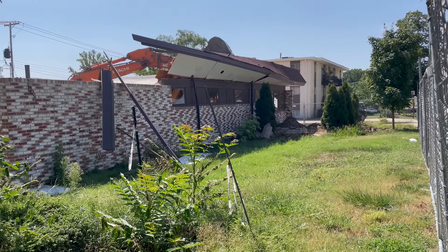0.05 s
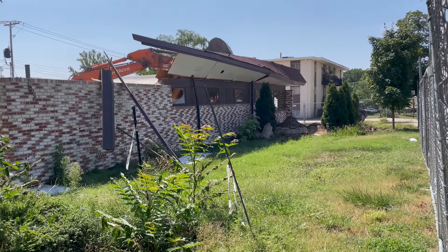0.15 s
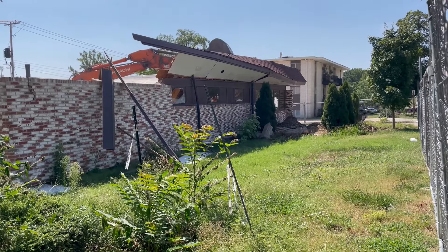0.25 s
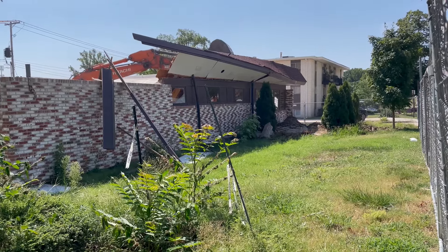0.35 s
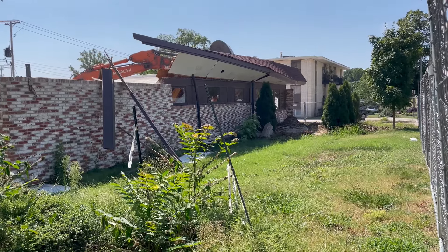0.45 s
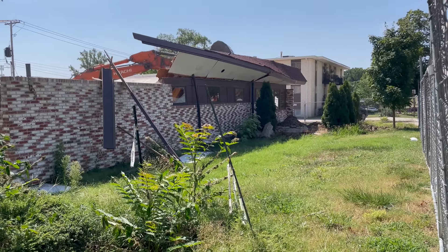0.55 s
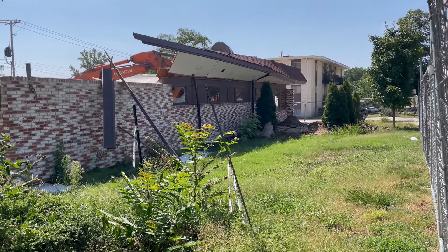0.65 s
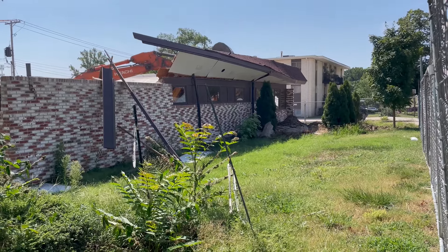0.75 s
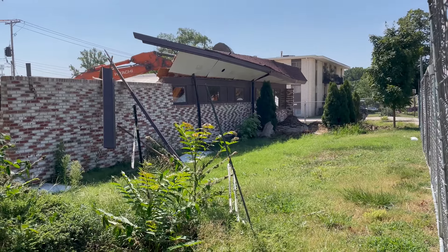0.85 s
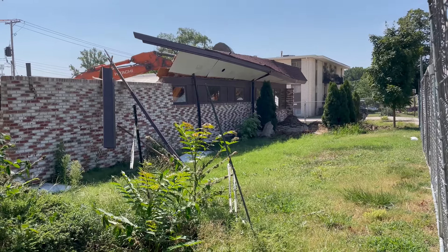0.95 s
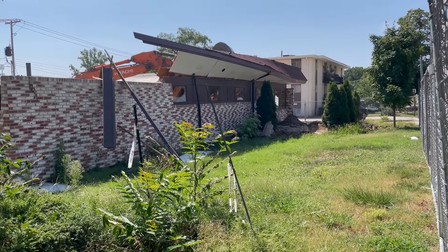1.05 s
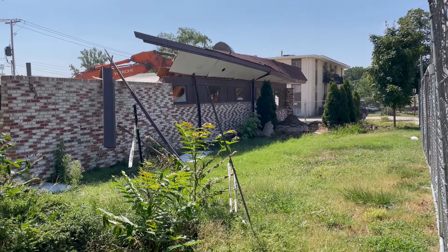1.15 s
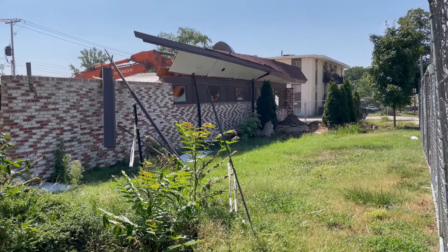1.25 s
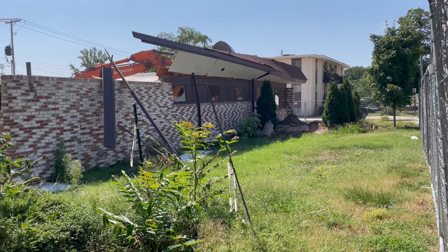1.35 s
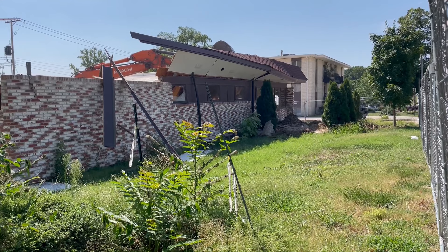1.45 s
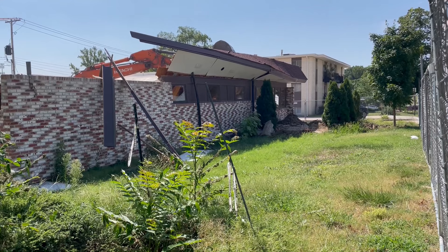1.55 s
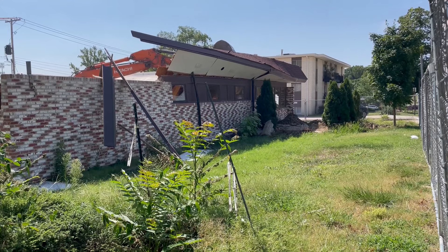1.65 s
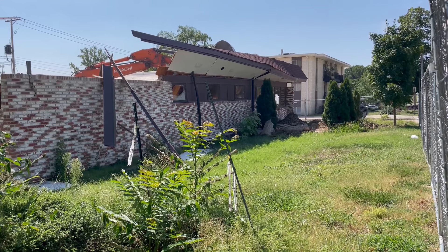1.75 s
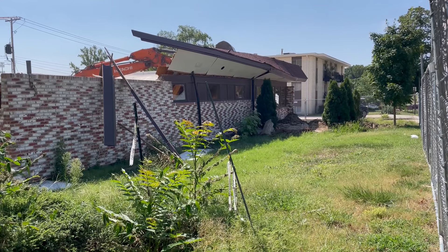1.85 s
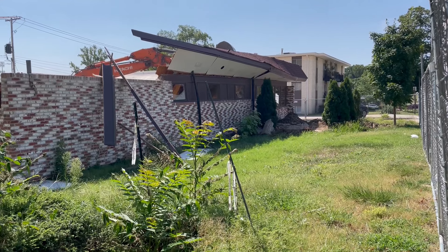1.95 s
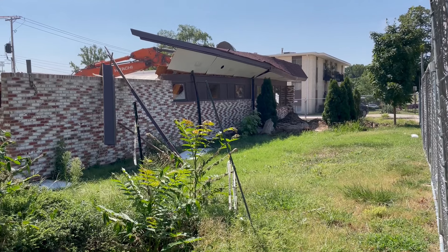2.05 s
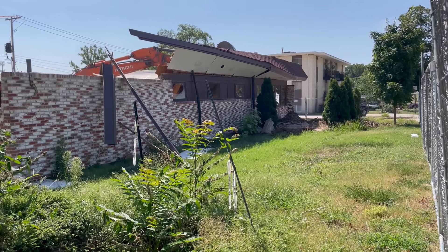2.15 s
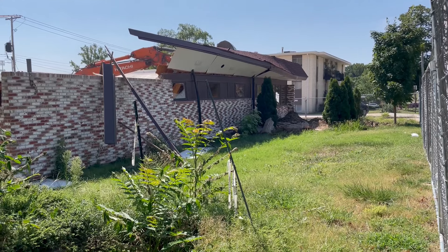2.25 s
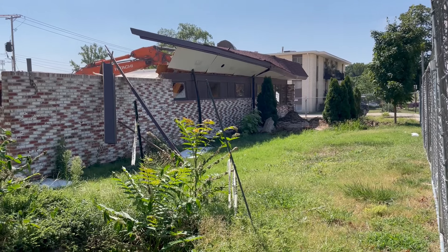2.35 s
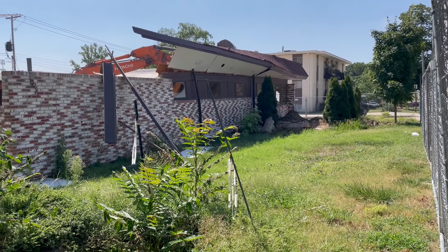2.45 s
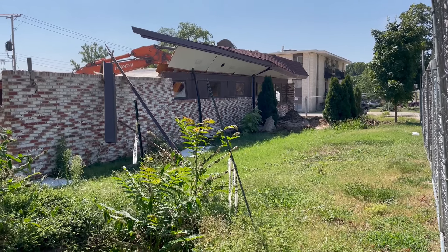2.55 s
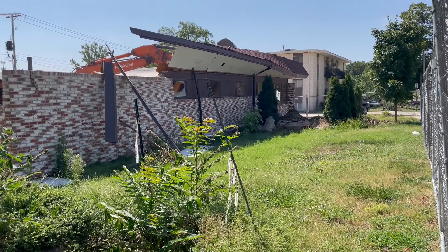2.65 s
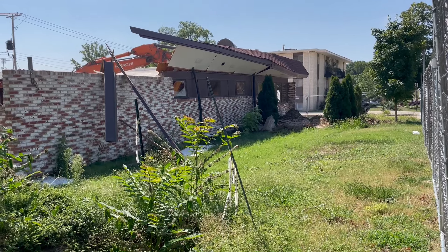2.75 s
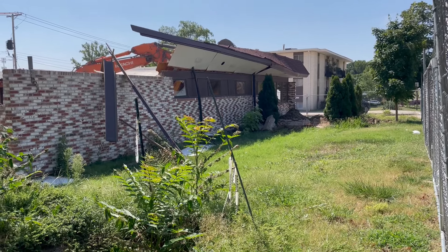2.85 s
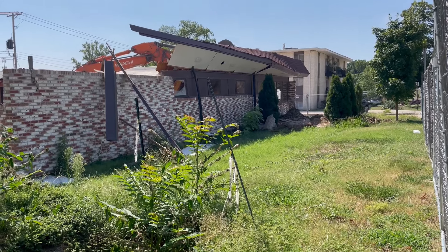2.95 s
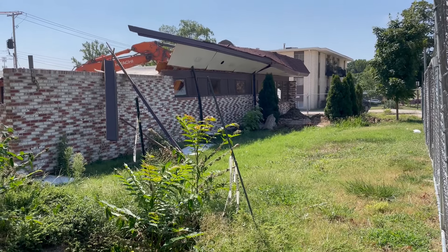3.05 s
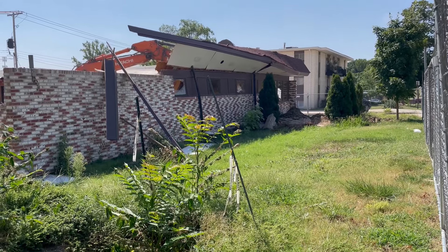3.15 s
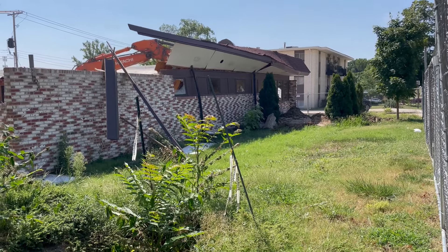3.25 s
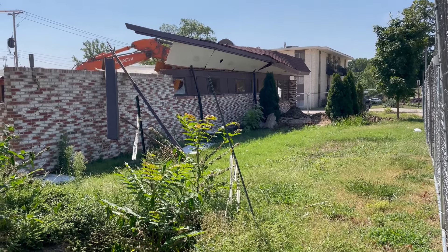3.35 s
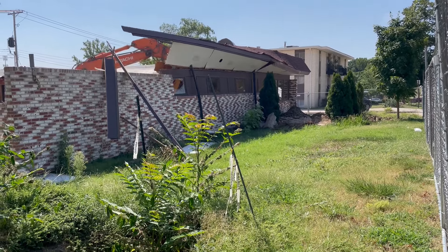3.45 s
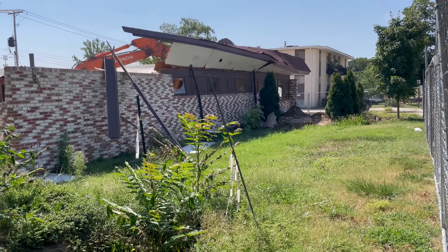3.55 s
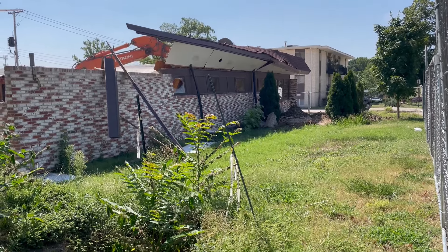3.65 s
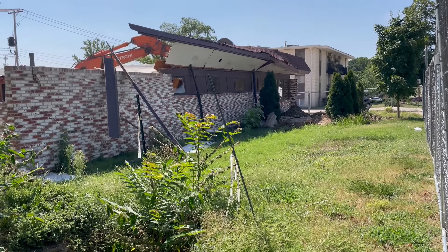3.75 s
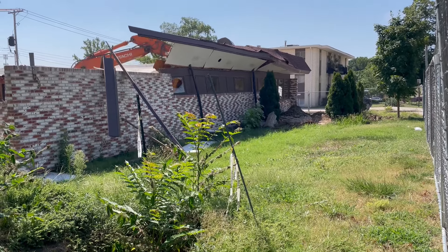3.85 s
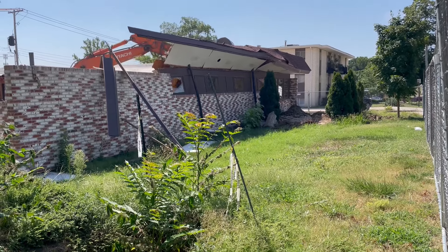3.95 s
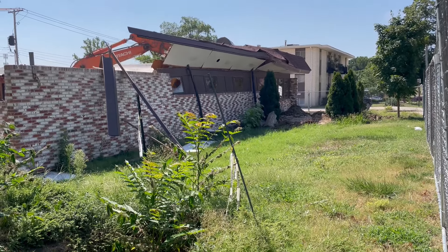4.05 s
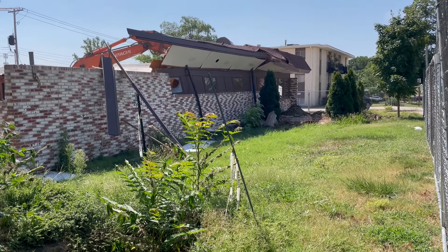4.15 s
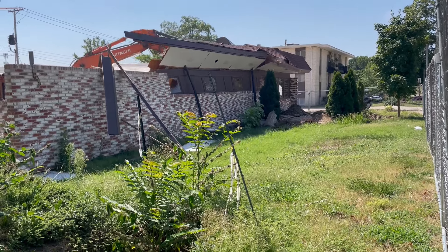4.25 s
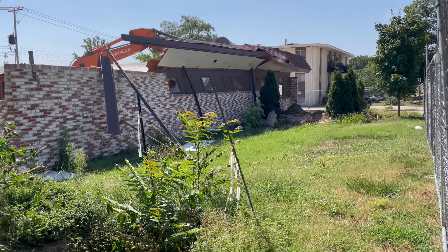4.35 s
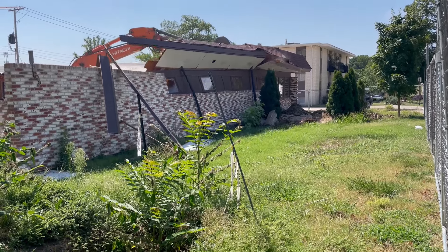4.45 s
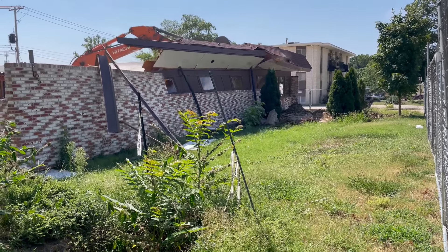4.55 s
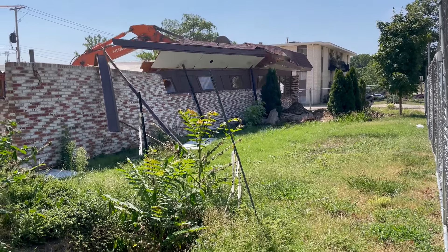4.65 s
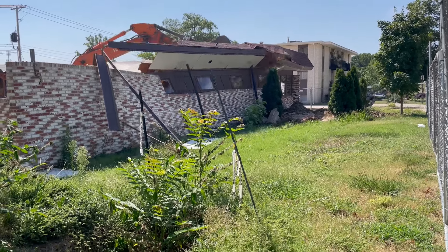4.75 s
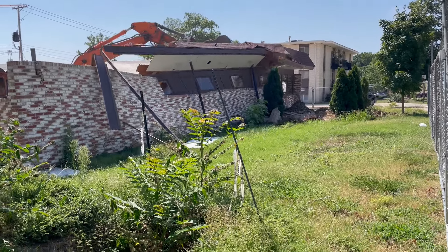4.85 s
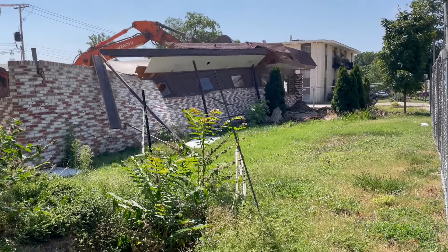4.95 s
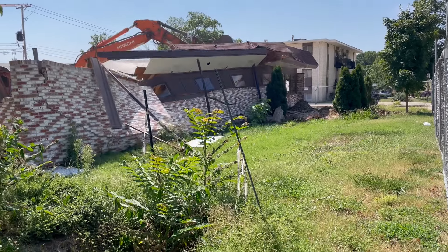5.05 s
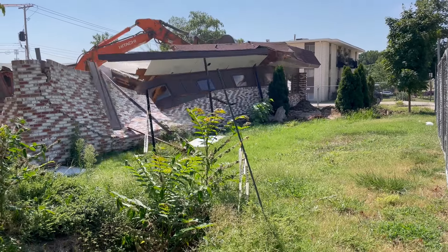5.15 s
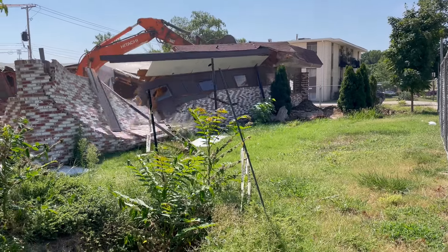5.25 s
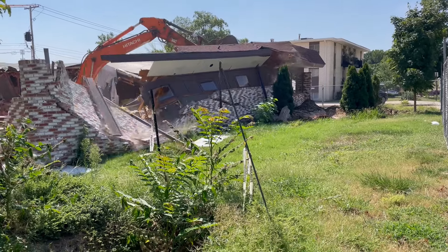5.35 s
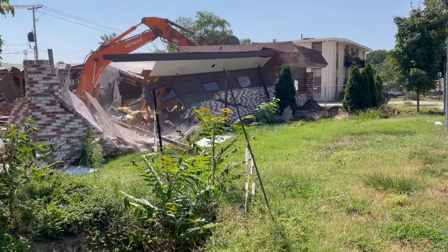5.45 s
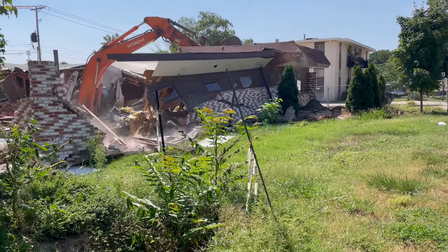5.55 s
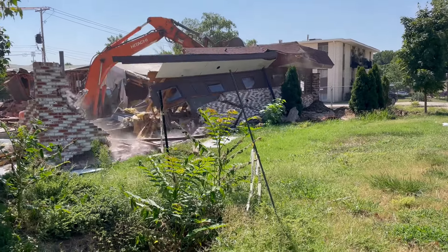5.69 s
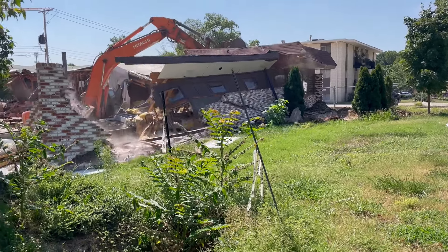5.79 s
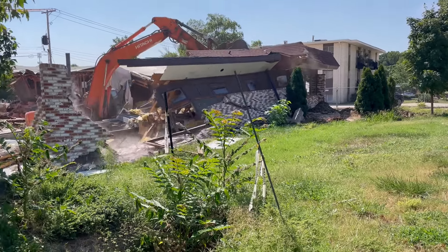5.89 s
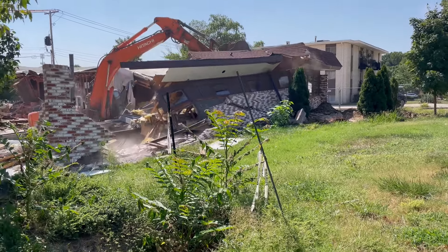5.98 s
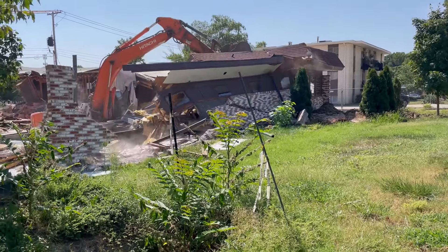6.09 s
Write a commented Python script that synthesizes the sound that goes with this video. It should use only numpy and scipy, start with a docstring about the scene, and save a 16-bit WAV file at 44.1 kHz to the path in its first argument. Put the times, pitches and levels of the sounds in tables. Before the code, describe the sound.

Outdoors, across a lawn from a demolition, the low hum of an excavator engine is heard first, with a barely audible insect in the weeds. Wood starts to splinter in separate cracks, followed by sharp snaps, knocks and deep thumps. The breaking becomes continuous, and ends at its loudest with a brick wall crashing down amid clattering boards, scraping roofing and rumbling rubble.

```python
"""A diesel drones behind a wall and an insect chirps in the weeds on a summer day.
Across the lawn an excavator pulls down a low brick building: timber and roofing crack and ring,
rubble slides, and heavy masses shake the ground, louder and louder until the wall falls.
Two close microphone ports pick up the direct and the scattered sound."""
import sys
import numpy as np
from scipy import signal
from scipy.fft import rfft, irfft, next_fast_len
from scipy.io import wavfile
from scipy.ndimage import uniform_filter1d

SR = 44100
rng = np.random.default_rng(int(sys.argv[2]) if len(sys.argv) > 2 else 0)


def materialize(psi):
    """Save the field psi as 16-bit PCM at rate SR to the path in sys.argv[1].

    A 1-D psi becomes a single channel; in a 2-D psi each row is a channel.
    """
    bounded = np.clip(np.atleast_2d(psi).T, -1, 1)
    quanta = np.round(bounded * 32767).astype(np.int16)
    wavfile.write(sys.argv[1], SR, quanta)


N = 269892
TIME_S = np.arange(N) / SR
FFT_SIZE = next_fast_len(N + SR)
BIN_HZ = np.maximum(np.arange(FFT_SIZE // 2 + 1) * SR / FFT_SIZE, 1)


def amp(db):
    """Decibels to gain."""
    return 10 ** (np.asarray(db) / 20)


def unit_rms(x):
    """Scales to rms 1."""
    return x / np.sqrt(np.mean(x ** 2) + 1e-20)


def per_bin(points):
    """Rows of (Hz, value) read at every FFT bin, on a log axis."""
    hz, value = np.transpose(points)
    return np.interp(np.log(BIN_HZ), np.log(np.maximum(hz, 1)), value)


def colour(x, spectrum):
    """Applies a spectrum of (Hz, dB) rows at minimum phase, so nothing sounds early."""
    cepstrum = irfft(per_bin(spectrum) * np.log(10) / 20, FFT_SIZE)
    cepstrum[1:FFT_SIZE // 2] *= 2
    cepstrum[FFT_SIZE // 2 + 1:] = 0
    return irfft(rfft(x, FFT_SIZE) * np.exp(rfft(cepstrum)), FFT_SIZE)[:N]


def band(x, low_hz, high_hz):
    """Band-pass."""
    return signal.sosfilt(signal.butter(2, [low_hz, high_hz], "band", fs=SR, output="sos"), x)


def resonate(x, hz, width_hz):
    """One mode, peak gain 1."""
    r = np.exp(-np.pi * width_hz / SR)
    return signal.lfilter([1 - r, 0, r - 1], [1, -2 * r * np.cos(2 * np.pi * hz / SR), r * r], x)


def drift(rate_hz):
    """Slow random wander, rms 1."""
    r = np.exp(-2 * np.pi * rate_hz / SR)
    return unit_rms(signal.lfilter([1], [1, -2 * r, r * r], rng.standard_normal(N + SR))[SR:])


def contacts(per_s, uneven_db):
    """Dense, uneven impacts of fragments; white, rms 1."""
    sizes = amp(uneven_db * np.minimum(rng.exponential(1, N), 5)) * rng.standard_normal(N)
    return unit_rms(sizes * (rng.random(N) < per_s / SR))


def swell(t, rise_s, t60_s):
    """Quick rise, exponential fall, peak 1."""
    shape = (1 - np.exp(-t / rise_s)) * amp(-60 * t / t60_s)
    return shape / shape.max()


# Exhaust and engine clatter. Each row: frequency in Hz, relative density in dB.
DIESEL_SPECTRUM = [(25, -23.5), (55, -3), (100, -1.5), (200, -10.5), (400, -17), (700, -24.5), (850, -33),
                   (1180, -30.5), (1400, -40.5), (2200, -37), (5000, -44), (9000, -51.5), (12000, -60),
                   (16000, -92)]
# Engine orders and pump whine. Each row: frequency in Hz, level in dB, fade start in seconds.
ENGINE_TONES = [(341, -46.5, 6), (441.4, -53, 0.9), (578, -58, 6), (662.1, -48.5, 1), (1168, -56.5, 0.75),
                (1222, -64, 6), (3790, -64.5, 0.4)]

def engine(firing_hz=69, throb=0.12, roar_db=-31.5, waver_db=3.5, fade_s=0.3, fade_db=-12):
    """A distant diesel pulses with each firing; its wavering tones sink as the load changes."""
    crank_s = TIME_S + 0.00018 * drift(3.95)   # the governor lets the speed wander
    puffs = rng.standard_normal(N) * (1 + throb * np.sin(2 * np.pi * firing_hz * crank_s))
    out = amp(roar_db) * unit_rms(colour(puffs, DIESEL_SPECTRUM))
    for hz, db, fade_start_s in ENGINE_TONES:
        faded = np.clip((TIME_S - fade_start_s) / fade_s, 0, 1)
        out += amp(db + waver_db * drift(12) + fade_db * faded) * np.sin(2 * np.pi * hz * crank_s)
    return out


# Chirp syllables. Each row: start in seconds, length in seconds, pitch in Hz, level in dB.
SYLLABLES = [(0.197, 0.12, 9430, -61), (0.29, 0.11, 9840, -65), (0.386, 0.088, 10100, -74)]

def insect(period_s=0.241, wing_hz=115, width_hz=320):
    """Three rising syllables repeat, each a train of wing strokes."""
    out = np.zeros(N)
    strokes = rng.standard_normal(N) * (1 + np.sin(2 * np.pi * wing_hz * TIME_S))
    for start_s, length_s, hz, db in SYLLABLES:
        progress = np.minimum((TIME_S - start_s) % period_s / length_s, 1)
        gate = (np.sin(np.pi * progress) ** 2 + 1e-12) ** 0.25
        out += amp(db) * gate * unit_rms(band(strokes, hz - width_hz / 2, hz + width_hz / 2))
    return out


# Cracks and blows. Each row: start in seconds, splinter, knock and thud levels in dB,
# low ring in Hz, its dB over the louder of knock and thud, high ring in Hz, its dB over splinter,
# splinter t60 in seconds.
BREAKS = [(0.8644, -49, -41, -39, 696, 3, 2590, -2, 0.11), (0.9123, -44, -48, -43, 330, 1, 4150, 6, 0.14),
          (0.9532, -43, -42.5, -54, 282, 8, 2210, 3, 0.14), (1.612, -40, -38.5, -50, 353, 5, 2060, 5, 0.17),
          (1.8353, -34, -33.5, -24.5, 484, -3, 2080, 5.5, 0.17),
          (1.938, -36.5, -35, -30, 307, 1, 3860, 5, 0.17), (2.025, -43, -33, -39, 570, -9, 3120, 13, 0.033),
          (2.135, -37, -46, -43, 304, -4, 3080, 7, 0.067), (2.228, -42.5, -52, -53, 426, -7, 2180, 5, 0.11),
          (2.4916, -55, -63, -34.5, 332, 11.5, 2150, -7, 0.3),
          (2.738, -45, -36.5, -31.5, 1090, -6, 3900, 3, 0.9),
          (2.76, -36, -45, -50, 1100, 0, 3300, 7, 0.025),
          (2.8, -33.5, -34.5, -45, 545, 8.5, 3580, 0.5, 0.25),
          (2.934, -33, -34, -30, 627, 1, 2100, 0, 0.027), (3.075, -35, -36, -36, 606, 12.5, 2340, -4, 0.1),
          (3.095, -35, -48, -33, 308, -11, 2300, 4, 0.02),
          (3.14, -28.5, -26.5, -47, 372, -20, 3340, -1, 0.23),
          (3.1836, -38, -23.5, -35, 410, 6.5, 2100, -10, 0.18),
          (3.251, -29, -34, -47, 285, -14, 4830, 7.5, 0.08),
          (3.2858, -27.5, -25, -43, 338, -14, 2270, -4, 0.042),
          (3.358, -16, -10.5, -20, 1440, -15, 2000, -19, 0.21),
          (3.413, -20, -27, -21, 600, -15, 2370, -1.5, 0.48),
          (3.4355, -20, -14, -32, 382, -13, 3300, 14, 0.026),
          (3.5273, -22.5, -21.5, -26, 530, 2.5, 2230, 3.5, 0.036),
          (3.6082, -24.5, -21.5, -43, 740, -1, 2270, -5, 0.14),
          (3.678, -23, -16, -20.5, 718, 0, 1960, -12, 0.49),
          (3.8015, -18, -21, -37, 816, -1, 3700, 1.5, 0.028),
          (3.8556, -20.5, -26.5, -21.5, 634, 7.5, 3630, -6, 0.07),
          (3.926, -22.5, -23.5, -25, 750, -4, 3350, -12, 0.16),
          (3.9734, -21.5, -17, -28, 750, 6, 2200, -4, 0.031),
          (4.057, -23.5, -24.5, -30, 700, 3.5, 2130, -21, 0.13),
          (4.126, -24, -21, -13.5, 285, 9.5, 3820, -15, 0.022),
          (4.1641, -12.5, -11, -37, 620, -1, 4430, -4, 0.037),
          (4.2084, -16, -11.5, -13, 650, 2.5, 2400, 1.5, 0.19),
          (4.286, -25.5, -23, -40, 624, -17, 3300, 10.5, 0.13),
          (4.474, -25.5, -23, -13, 450, 2, 2500, 3.5, 0.034),
          (4.57, -10.5, -17.5, -22, 460, -11, 3780, 5.5, 0.096),
          (4.6305, -15.5, -42, -22.5, 690, -4, 4970, 10, 0.065),
          (4.642, -17.5, -45, -40, 500, -5, 5340, 10, 0.065),
          (4.6763, -15.5, -47, -23, 384, 5, 3800, -3, 0.11),
          (4.753, -22.5, -28, -25, 550, -3, 5900, 5.5, 0.079),
          (4.908, -13.5, -11, -11, 676, -4, 1870, -13, 0.046),
          (4.9416, -17.5, -39, -17, 300, -8, 2170, -16, 0.043),
          (5.0863, -15, -50, -24, 637, -7, 3800, -2, 0.016),
          (5.1447, -18.5, -31, -15.5, 600, 4.5, 3780, -20, 0.97),
          (5.2625, -14, -33, -24, 600, -14, 2160, 6, 0.068), (5.36, -13, -12, -23, 1120, 6, 1900, -5, 0.02),
          (5.423, -42, -22, -34, 1130, 16, 2320, 25, 0.17),
          (5.537, -13, -14, -31, 368, 3.5, 5700, -2.5, 0.18),
          (5.572, -18, -13, -19.5, 1050, -1, 3500, 1, 0.44),
          (5.6075, -18.5, -15, -34, 1200, 1.5, 1780, -5, 0.16),
          (5.668, -15, -32, -33, 587, -3, 4970, -3, 0.024),
          (5.697, -9.5, -39, -30.5, 760, 20.5, 3730, -26, 0.025),
          (5.755, -9, -20, -35, 434, 11, 5740, 3, 0.08), (5.854, -19, -21.5, -39, 1100, 7, 2070, -15, 0.21),
          (5.911, -15, -35, -18.5, 600, 1, 5900, 11, 0.063),
          (6.0623, -20.5, -39, -18.5, 282, -5.5, 5200, -7, 0.15)]

def cracks(rise_s=0.002, snap=8.8, low_q=5, high_q=4.5, min_width_hz=112):
    """Timber and roofing break. Returns splinter, knock and thud envelopes, and the rough ringing."""
    t = np.arange(SR // 4) / SR
    power, rings = np.zeros((3, N + SR)), np.zeros(N + SR)
    shower = amp(-14) * swell(t, rise_s=0.023, t60_s=0.17)   # each break sheds bits
    for start_s, *levels_db, low_hz, low_db, high_hz, high_db, t60_s in BREAKS:
        start, t60_s = round(start_s * SR), max(t60_s, 0.02)
        span = slice(start, start + len(t))
        for size, db in enumerate(levels_db):
            stretch = 1.375 ** size   # bigger pieces swell later and last longer
            blow = swell(t, rise_s * stretch, t60_s * stretch)
            power[size, span] += amp(db) ** 2 * (blow ** 2 + shower ** 2)
        fibres = rng.standard_normal(len(t)) * amp(5.9 * rng.standard_normal(len(t)))
        tear = fibres * (1 - np.exp(-t / rise_s)) * amp(-60 * t / (1.44 * t60_s))
        tear[round(rise_s * SR)] += snap   # the first fibres part at once
        splinter_db, knock_db, thud_db = levels_db
        for hz, db, q in ((low_hz, low_db + max(knock_db, thud_db), low_q),
                          (high_hz, high_db + splinter_db, high_q)):
            width_hz = max(hz / q, min_width_hz)
            ring = resonate(resonate(tear, hz, width_hz), hz, 2 * width_hz)
            rings[span] += amp(db) * ring / np.abs(ring).max()
    return np.sqrt(power[:, :N]), rings[:N]


# Falling debris. Each row: frequency in Hz, relative density in dB.
DEBRIS_SPECTRUM = [(30, -19), (60, 2.5), (110, -1), (250, -8), (620, -10.5), (900, -22), (1170, -15.5),
                   (1450, -19), (4300, -14), (6000, -16.5), (8000, -9), (11000, -21.5), (13000, -28.5),
                   (14000, -43)]

def debris(impacts, envelope, low_hz, high_hz):
    """Fragments of one size class fill one band; the envelope sets its rms."""
    steady_rms = np.std(band(colour(impacts, DEBRIS_SPECTRUM), low_hz, high_hz))
    return band(colour(impacts * envelope, DEBRIS_SPECTRUM), low_hz, high_hz) / steady_rms


# Brittle pieces. Each row: start in seconds, pitch in Hz, peak in dB, t60 in seconds.
BRITTLE_MODES = [(0.915, 4350, -46, 0.054), (1.837, 3550, -30, 0.071), (1.837, 3030, -34, 0.097),
                 (2.739, 4190, -38, 0.04), (3.362, 1415, -12, 0.072), (3.438, 3130, -11, 0.02),
                 (4.166, 1750, -9, 0.017), (4.169, 4230, -10, 0.058), (4.175, 4530, -10.5, 0.031),
                 (4.572, 5300, -10, 0.048), (4.571, 4200, -19, 0.12), (4.573, 3175, -17, 0.09),
                 (4.573, 3430, -31, 0.1), (4.678, 4300, -17, 0.051), (5.011, 1515, -20, 0.06),
                 (5.263, 4390, -16.5, 0.048), (5.538, 6150, -10.5, 0.028), (5.67, 4850, -22, 0.051)]

def pings(contact_s=0.00069):
    """The brief contact of a snap leaves one clear mode ringing."""
    out, t = np.zeros(N + SR), np.arange(SR // 4) / SR
    for start_s, hz, db, t60_s in BRITTLE_MODES:
        push = (rng.standard_normal(len(t)) + 2 * np.cos(2 * np.pi * hz * t)) * np.exp(-t / contact_s)
        width_hz = np.log(1000) / np.pi / max(t60_s, 0.02)
        ring = resonate(push + 1e-18, hz, width_hz)
        out[round(start_s * SR):][:len(t)] += amp(db) * ring / np.abs(ring).max()
    return out[:N]


# Course of the slide. Each row: time in seconds, then rumble, chunk and grit levels in dB.
SLIDE_LEVELS = [(1.57, -35, -39, -52), (1.64, -45, -40, -39.5), (1.84, -47, -35, -44.5),
                (2.03, -27, -32.5, -36.5), (2.23, -47, -41.5, -47), (2.45, -53, -52, -74),
                (2.74, -45, -43, -44), (2.93, -34, -28, -39), (3.17, -26, -42, -40),
                (3.34, -25.5, -28, -31), (3.63, -26, -30, -32.5), (4.02, -26, -27.5, -29),
                (4.47, -30, -24.5, -29), (4.86, -22, -24, -27.5), (5.06, -19.5, -19, -23.5),
                (5.32, -16, -13.5, -20.5), (5.59, -22.5, -17, -22.5), (5.94, -20, -17.5, -21),
                (6.12, -20.5, -19, -22.5)]

def rubble(splinter, knock, thud, wall_falls_s=5.3):
    """Chunks tumble, grit slides and the ground rumbles, surging with the envelopes of the cracks."""
    times_s, *curves_db = np.transpose(SLIDE_LEVELS)
    rumble_db, chunks_db, grit_db = [np.interp(TIME_S, times_s, db, left=-120) for db in curves_db]
    heaps_db = 1.2 * drift(12.7)   # rubble arrives in heaps
    tumbling, sliding = amp(chunks_db + heaps_db), amp(grit_db - 8 + heaps_db)
    out = debris(contacts(3000, 2.8), np.hypot(amp(rumble_db), thumps()), 35.4, 189)
    out += debris(contacts(2500, 2.4), np.hypot(amp(-6) * tumbling, amp(-3) * thud), 156, 800)
    out += debris(contacts(4000, 0.55), np.hypot(amp(-8.5) * tumbling, amp(-2) * knock), 602, 1800)
    fine = contacts(12000, 1.2)
    out += debris(fine, np.hypot(sliding, amp(-1.5) * splinter), 1250, 7410)
    dust_db = np.where(TIME_S < wall_falls_s, -2.5, -1.5)   # clearer once the wall is down
    dust_puffs = uniform_filter1d(splinter, size=SR // 200, origin=SR // 500)   # lag each break
    out += debris(fine, amp(dust_db) * np.hypot(sliding, amp(-7) * dust_puffs), 6800, 13000)
    boards = amp(chunks_db - 11) * clatter(per_s=420, low_hz=450, high_hz=1400, q=11)
    shards = amp(grit_db - 8) * clatter(per_s=4000, low_hz=1893, high_hz=6263, q=50)
    return out + boards + shards + amp(-19.5) * tumbling * scrape()


def clatter(per_s, low_hz, high_hz, q, sizes=14):
    """Loose pieces knock at random, each size with its own short ring."""
    knocks, size_hit = contacts(per_s, 1), rng.integers(0, sizes, N)
    return unit_rms(sum(resonate(knocks * (size_hit == size) + 1e-18, hz, hz / q)
                        for size, hz in enumerate(np.geomspace(low_hz, high_hz, sizes))))


def scrape(hz=1163, width_hz=31):
    """Roofing drags over the wall; dense contacts drive one narrow resonance."""
    ring = resonate(contacts(1500, 0.52), hz, width_hz)
    return unit_rms(resonate(ring, hz, 2 * width_hz))


# Heavy masses landing. Each row: start in seconds, level in dB.
LANDINGS = [(1.85, -23), (1.97, -25), (2.668, -32.5), (2.9, -24.5), (3.37, -20), (3.51, -21), (3.681, -14),
            (3.8, -30), (4.13, -16), (4.31, -20.5), (4.46, -16), (4.58, -18), (4.92, -14), (5.18, -22),
            (5.3, -15.5), (5.42, -27), (5.57, -12), (5.741, -13.5), (5.9, -14), (6.09, -18)]

def thumps(rise_s=0.0029, t60_s=0.39):
    """Envelope of the ground shaking under each heavy fall."""
    power, t = np.zeros(N + SR), np.arange(SR // 2) / SR
    for start_s, db in LANDINGS:
        power[round(start_s * SR):][:len(t)] += (amp(db) * swell(t, rise_s, t60_s)) ** 2
    return np.sqrt(power[:N])


# Ticks on the sheet. Each row: start in seconds, level in dB.
SHEET_TICKS = [(5.0584, -16), (5.1224, -12.5), (5.1871, -18), (5.2041, -14), (5.2315, -14), (5.288, -14),
               (5.3093, -12), (5.3685, -12.5), (5.4864, -31), (5.5123, -15)]
# Modes of the sheet. Each row: frequency in Hz, gain in dB, t60 in seconds.
SHEET_MODES = [(3800, -7, 0.013), (5300, -3, 0.0094), (6150, -1.5, 0.012)]

def rattle(spread_db=3.1):
    """A brittle sheet rattles as the wall tips; each tick rings its modes unevenly."""
    starts_s, ticks_db = np.transpose(SHEET_TICKS)
    offsets_db = rng.normal(0, spread_db, (len(starts_s), len(SHEET_MODES)))
    out = np.zeros(N)
    for (hz, mode_db, t60_s), uneven_db in zip(SHEET_MODES, offsets_db.T):
        ticks = np.full(N, 1e-18)
        ticks[(starts_s * SR).astype(int)] = amp(ticks_db + mode_db + uneven_db)
        width_hz = np.log(1000) / np.pi / t60_s
        out += resonate(ticks, hz, width_hz) * SR / (2 * np.pi * width_hz)
    return out


# Phase between the ports. Each row: frequency in Hz, lead of the left in radians.
LEFT_LEAD = [(0, 0), (900, .5), (5200, .3), (7300, -3.1), (11200, -6.3), (14500, -9.4), (16000, -11)]
# Scattered sound. Each row: frequency in Hz, level over the direct sound in dB.
SCATTER_SPECTRUM = [(60, -23), (150, -14.5), (350, -11), (800, -6), (1500, -7.5), (4000, -6), (7000, -16),
                    (12000, -20)]
# Port balance. Each row: frequency in Hz, left over right in dB.
PORT_BALANCE = [(60, -0.5), (150, -1.5), (350, 0), (700, -0.5), (1400, 1.5), (4000, 1.5), (10000, 0.5)]

def ports(x, scatter_t60_s=0.25):
    """Direct sound reaches the two ports out of phase; scattered sound arrives from the sides."""
    t = np.arange(SR // 2) / SR
    tail = rng.standard_normal(len(t)) * amp(-60 * t / scatter_t60_s)
    scattered = amp(per_bin(SCATTER_SPECTRUM)) * rfft(tail / np.linalg.norm(tail), FFT_SIZE)
    side = np.array([[1], [-1]])   # left, right
    hz, lead_rad = np.transpose(LEFT_LEAD)
    phase = np.exp(0.5j * side * np.interp(BIN_HZ, hz, lead_rad))
    balance = amp(side * per_bin(PORT_BALANCE) / 2)
    return irfft(rfft(x, FFT_SIZE) * phase * balance * (1 + side * scattered), FFT_SIZE)[:, :N]


def scene():
    """Demolition, engine and insect, heard through the two ports."""
    (splinter, knock, thud), rings = cracks()
    demolition = rings + rubble(splinter, knock, thud) + pings() + rattle()
    return ports(engine() + insect() + demolition)


def record(dry):
    """Soft clipping rounds the peaks; a steep low-pass cuts the top."""
    stop_db, stop_hz = 70, 15950
    rounded = 1.028 * np.tanh(dry / 1.209)
    return signal.sosfilt(signal.cheby2(16, stop_db, stop_hz, fs=SR, output="sos"), rounded)


dry = scene()
out = record(dry)
materialize(out)
```